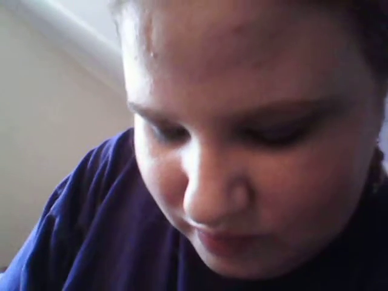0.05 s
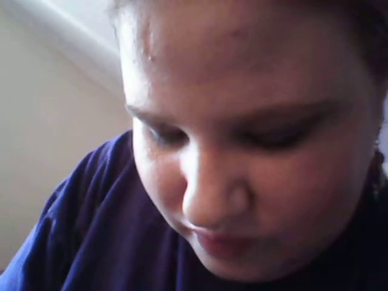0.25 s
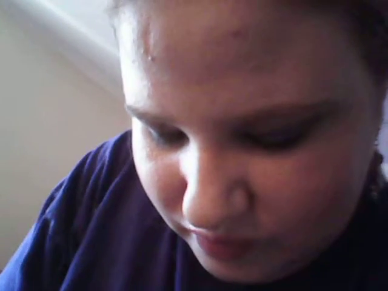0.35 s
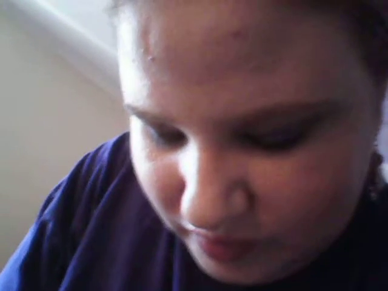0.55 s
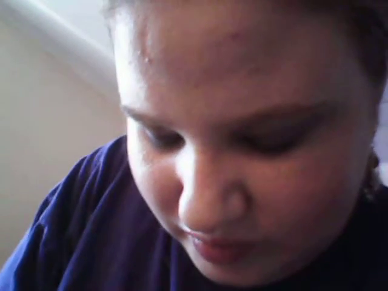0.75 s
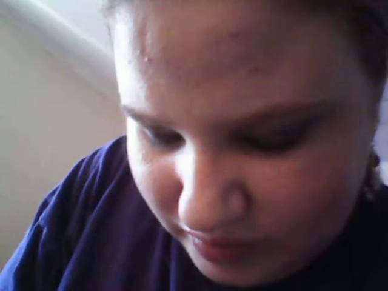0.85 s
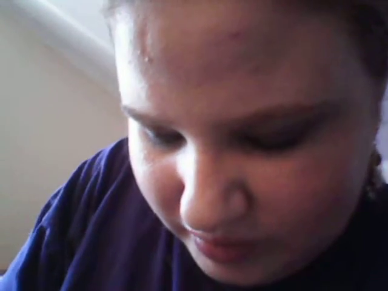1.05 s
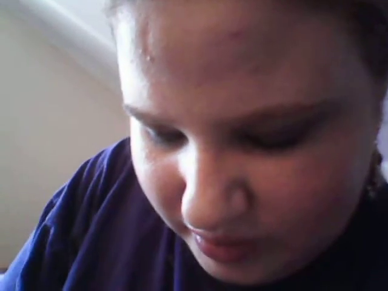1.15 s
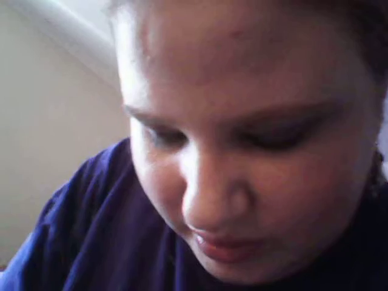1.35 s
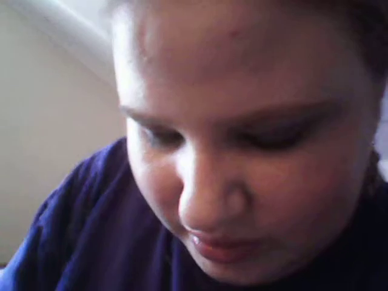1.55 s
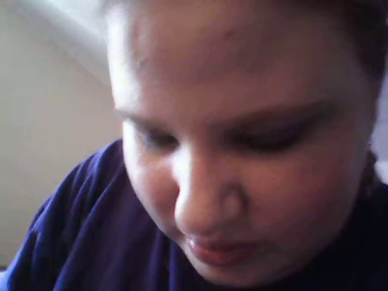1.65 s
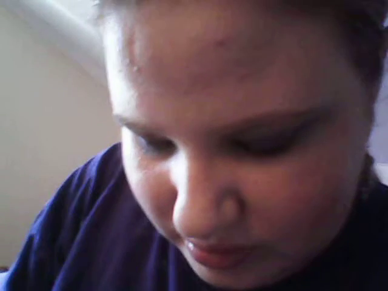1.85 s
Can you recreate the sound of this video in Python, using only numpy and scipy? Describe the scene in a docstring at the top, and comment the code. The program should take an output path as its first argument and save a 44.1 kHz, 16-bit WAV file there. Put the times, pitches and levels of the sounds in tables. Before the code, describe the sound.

A close metallic click and a sharp snap, like a can tab, over faint hiss.

```python
"""Rumble, hiss, mains hum and a thin electrical whine run throughout, on a cheap microphone.
Close by, a small springy piece of metal, perhaps a can tab, clicks at 0.20 s, creaks from 0.41 s
and snaps over at 0.44 s. Each blow is a brief crack plus the ring of the metal; a small room answers.
Just after the snap, ring and echo dip in level. A soft low bump follows at 1.19 s, a faint pop at 1.40 s."""
import sys
import numpy as np
from scipy import signal
from scipy.fft import rfft, irfft
from scipy.io import wavfile

SR = 44100
rng = np.random.default_rng(int(sys.argv[2]) if len(sys.argv) > 2 else 0)


def put_to_file(sound):
    """Save the sound as 16-bit audio at rate SR, in the file named by the first command-line argument."""
    columns = np.atleast_2d(sound).T  # one column per channel
    safe = np.clip(columns, -1, 1)
    whole_steps = np.round(safe * 32767)
    wavfile.write(sys.argv[1], SR, whole_steps.astype(np.int16))


N = 83790

# modes of the metal: pitch_hz, t60_s, click_db, snap_db
METAL_MODES = [(530, 0.013, -10.5, -37.5), (1130, 0.014, -30, -18), (2416, 0.023, -20, -8),
               (2863, 0.049, -34, -8.5), (3066, 0.02, 2.5, 1.5), (3893, .02, -7, -12),
               (4197, .02, -5.5, -5.5), (5030, .025, -9.5, -8.5), (6050, .022, -17.5, -2.5),
               (6570, .014, -1.5, -2), (6800, 0.018, 2.5, -17.5), (7800, .02, -8.5, -2.5),
               (8720, .018, -2.5, -20.5), (9413, .028, -13.5, -3.5)]


def undb(db):
    """Decibels to gain."""
    return 10 ** (np.asarray(db) / 20)


def along(points, hz):
    """Interpolate (freq_hz, value) points on a log-frequency axis."""
    freq_hz, values = np.array(points, float).T
    return np.interp(np.log(np.maximum(hz, 1)), np.log(freq_hz), values)


def tint(x, colour):
    """Minimum-phase filter from (freq_hz, gain_db) points; attacks stay sharp."""
    gain = undb(along(colour, np.fft.rfftfreq(2 * N, 1 / SR)))
    cepstrum = irfft(np.log(gain))
    cepstrum[1:N] *= 2
    cepstrum[N + 1:] = 0
    return irfft(rfft(x, 2 * N) * np.exp(rfft(cepstrum)))[:N]


def noise(colour):
    """Coloured noise, rms 1."""
    x = tint(rng.standard_normal(N), colour)
    return x / np.sqrt(np.mean(x ** 2))


def since(start_s):
    """Seconds since start, zero before it."""
    return np.maximum(np.arange(N) / SR - start_s, 0)


def strike(start_s, t60_s, attack_s=0.00051):
    """Envelope: fast rise, exponential fall."""
    age_s = since(start_s)
    return (1 - np.exp(-age_s / attack_s)) * np.exp(-np.log(1000) * age_s / t60_s)


def rumble_and_hiss():
    """Low and high noise, each drifting in level."""
    # spectra: freq_hz, gain_db
    rumble_colour = [(10, -13.5), (21, 6.5), (30, -14.5), (55, -9), (80, -20.5), (160, -20.5), (250, -26),
                     (350, -44.5), (600, -39.5), (1100, -38), (2500, -52.5)]
    hiss_colour = [(300, 6), (1500, -2.5), (3000, -2.5), (6000, -2.5), (9900, -4), (11000, -14.5),
                   (12000, -23)]
    # envelopes: time_s, rms_db
    rumble_level = [(0, -48.5), (.4, -48.5), (.52, -55), (.88, -53), (1.0, -51.5), (1.35, -50),
                    (1.481, -51), (1.8, -52.5)]
    hiss_level = [(0, -65.5), (.7, -64.5), (1.049, -63.5), (1.39, -63.5), (1.42, -67), (1.9, -66)]
    rumble_db = np.interp(since(0), *np.transpose(rumble_level))
    hiss_db = np.interp(since(0), *np.transpose(hiss_level))
    return undb(rumble_db) * noise(rumble_colour) + undb(hiss_db) * noise(hiss_colour)


def hum_and_whine(pulsed_hz=10100, pulsed_rms_db=-79, pulses_per_s=9.7):
    """Mains hum and electrical whine: steady sines plus one gated on and off."""
    # steady sines: pitch_hz, rms_db
    tones = [(119.5, -66.5), (7247, -82), (9599.5, -78.5)]
    t = since(0)
    steady = sum(undb(db) * np.sin(2 * np.pi * (hz * t + rng.random())) for hz, db in tones)
    gate = np.sin(2 * np.pi * pulses_per_s * t) > 0
    pulsed = undb(pulsed_rms_db) * np.sin(2 * np.pi * pulsed_hz * t) * gate
    return np.sqrt(2) * (steady + pulsed)


def blows(events, colour, modes_db, contact_db=12):
    """Each blow: a sharp contact pulse, a noise crack and the ringing modes of the metal."""
    crack, ring = np.zeros(N), np.zeros(N)
    for start_s, ring_db, crack_db, crack_t60_s in events:
        crack += undb(crack_db) * strike(start_s, crack_t60_s) * rng.standard_normal(N)
        crack[int(start_s * SR)] += undb(crack_db + contact_db)
        for (hz, t60_s, *_), db in zip(METAL_MODES, modes_db):
            ring += undb(ring_db + db) * strike(start_s, t60_s) * np.sin(2 * np.pi * hz * since(start_s))
    response = tint(signal.unit_impulse(N), colour)
    crack = signal.fftconvolve(crack, response / np.linalg.norm(response))[:N]
    highpass = signal.butter(2, METAL_MODES[0][0] / 2, "high", fs=SR, output="sos")
    return crack + signal.sosfilt(highpass, ring)


def click():
    """The metal is pressed: two blows 3 ms apart, heard as one."""
    # blows: start_s, ring_db, crack_db, crack_t60_s
    events = [(.2039, -11.5, -16, 0.014), (.2068, -44, -23, 0.021)]
    # crack spectrum: freq_hz, gain_db
    colour = [(100, -24.5), (300, -21), (490, -0.5), (620, 3.5), (850, -10), (1300, -5), (1600, -11),
              (2000, -11), (2600, -8.5), (3200, -4), (4200, -3.5), (5500, -4), (6700, 3), (7700, -14.5),
              (9200, 5), (10300, 0.5), (12000, -21)]
    return blows(events, colour, [click_db for _, _, click_db, _ in METAL_MODES])


def creaks():
    """Small dry slips of the metal under strain."""
    # noise bursts: start_s, level_db, t60_s
    slips = [(0.4062, -28.5, 0.014), (0.4155, -36.5, 0.017), (.4217, -41.5, .012), (0.4312, -21.5, 0.022),
             (0.4374, -12, .025)]
    # slip spectrum: freq_hz, gain_db
    colour = [(200, -16.5), (420, 0), (620, 4.5), (900, -4.5), (2500, -11.5), (4100, 4), (5200, -7.5),
              (6300, 1.5), (8500, -7), (11500, -15)]
    return sum(undb(db) * strike(start_s, t60_s) for start_s, db, t60_s in slips) * noise(colour)


def snap():
    """The metal gives way: a hard blow, then a weaker one."""
    # blows: start_s, ring_db, crack_db, crack_t60_s
    events = [(.4392, -9.5, -7.5, 0.013), (.4428, -19.5, -22.5, .05)]
    # crack spectrum: freq_hz, gain_db
    colour = [(60, -10), (150, -10.5), (250, -7.5), (450, -12), (720, -1), (1300, 2.5), (1900, -14),
              (2800, -4.5), (5000, -0.5), (8000, 4.5), (10300, 5.5), (12000, -22)]
    return blows(events, colour, [snap_db for *_, snap_db in METAL_MODES])


def knock(centre_s=0.4399, centre_hz=970, peak_db=-14.5):
    """The flipping metal shoves the air: one push-pull pressure pulse."""
    swing = 2 * np.pi * centre_hz * (since(0) - centre_s)
    return undb(peak_db) * swing * np.exp((1 - swing ** 2) / 2)


def room(x, wall_s=0.013, scatter_db=-11.5):
    """Light scatter, then two near echoes and a dense wall tail that dies band by band."""
    # tail decay: centre_hz, t60_s
    decay = [(300, .21), (1100, 0.16), (3000, 0.2), (4500, 0.18), (10000, .18)]
    # tail spectrum: freq_hz, gain_db
    colour = [(150, -15.5), (600, -12.5), (1200, -15), (2000, -1), (3000, -11), (4500, -8.5), (7000, -13.5),
              (9500, -14.5), (12000, -14)]
    # near surfaces: delay_s, level_db
    echoes = [(.0140, -19), (.0255, -26)]
    hz = np.fft.rfftfreq(N, 1 / SR)
    spectrum, tail = rfft(rng.standard_normal(N)), np.zeros(N)
    for centre_hz, t60_s in decay:
        band = along([(f, f == centre_hz) for f, _ in decay], hz)
        tail += irfft(spectrum * band, N) * strike(0, t60_s)
    tail *= np.where(since(0) < wall_s, undb(scatter_db), 1)
    response = tint(tail / np.linalg.norm(tail), colour)
    for delay_s, db in echoes:
        response[int(delay_s * SR)] += undb(db)
    return signal.fftconvolve(x, response)[:N]


def dip(start_s=0.4495, end_s=0.4725, slew_s=0.0002, dip_db=-17, after_db=-5.5):
    """Gain that drops just after the snap and partly recovers."""
    times_s = [start_s, start_s + slew_s, end_s, end_s + slew_s]
    return undb(np.interp(since(0), times_s, [0, dip_db, dip_db, after_db]))


def bump(centre_s=1.192, width_s=0.061, centre_hz=65.6, level_db=-49.5):
    """A soft swell of low noise."""
    low = noise([(centre_hz / 2, -6), (centre_hz, 0), (centre_hz * 2, -14), (centre_hz * 20, -60)])
    return undb(level_db) * np.exp(-((since(0) - centre_s) / width_s) ** 2) * low


def pop(start_s=1.4015, level_db=-39, fall_s=0.0082, edge_hz=8800):
    """A faint decaying step with a softened edge."""
    step = undb(level_db) * (since(0) > start_s) * np.exp(-since(start_s) / fall_s)
    return signal.sosfilt(signal.butter(1, edge_hz, fs=SR, output="sos"), step)


def scene():
    """Metal and room, dipped together, over the background; mono."""
    metal = click() + creaks() + snap() + knock()
    foreground = (metal + room(metal)) * dip()
    return (foreground + rumble_and_hiss() + hum_and_whine() + bump() + pop())[None]


def record(dry, mic_top_hz=11700, clip_level=0.66, top_hz=15800, dc_offset=-0.016):
    """The microphone loses the top treble, clips the loudest peaks and sits slightly off zero."""
    dull = signal.sosfilt(signal.butter(16, mic_top_hz, fs=SR, output="sos"), dry)
    clipped = np.clip(dull, -clip_level, clip_level)
    lowpass = signal.ellip(8, 0.2, 70, top_hz, fs=SR, output="sos")
    return signal.sosfilt(lowpass, clipped) + dc_offset


dry = scene()
out = record(dry)
put_to_file(out)
```